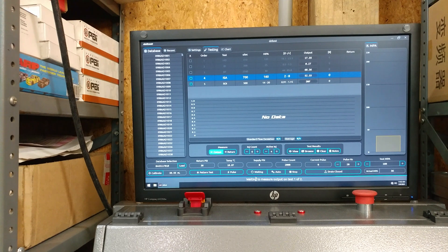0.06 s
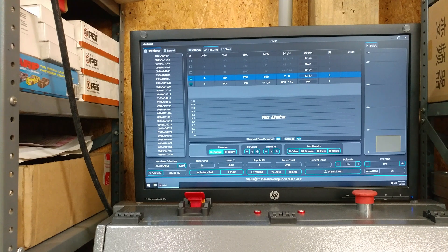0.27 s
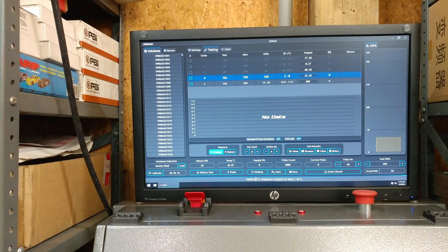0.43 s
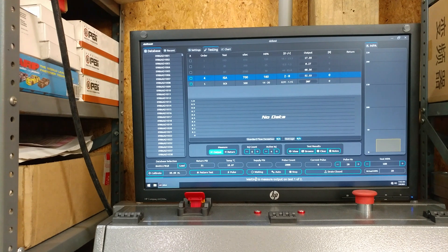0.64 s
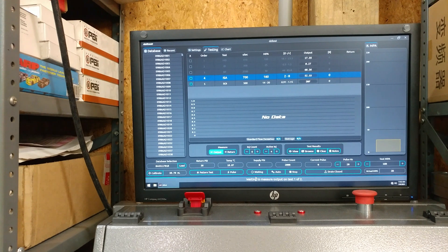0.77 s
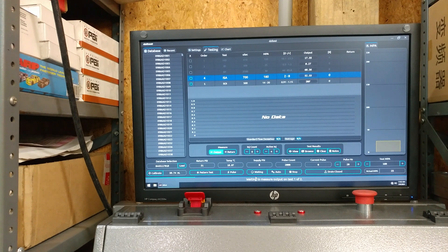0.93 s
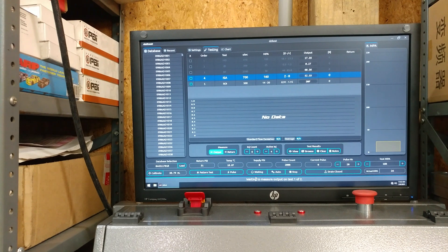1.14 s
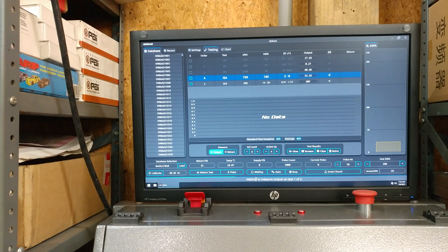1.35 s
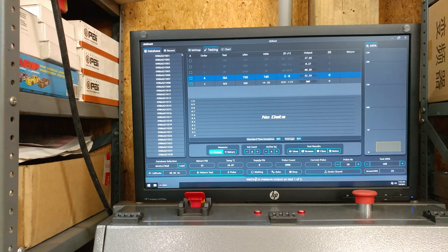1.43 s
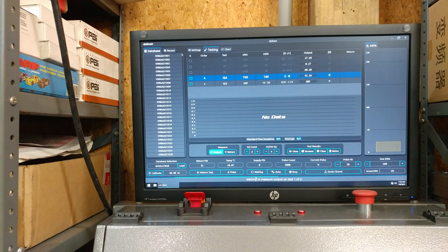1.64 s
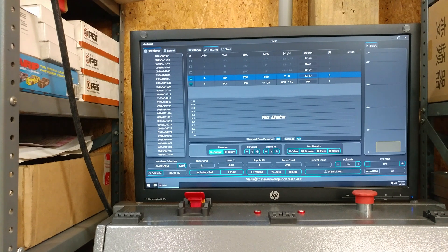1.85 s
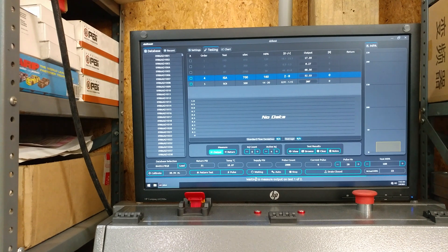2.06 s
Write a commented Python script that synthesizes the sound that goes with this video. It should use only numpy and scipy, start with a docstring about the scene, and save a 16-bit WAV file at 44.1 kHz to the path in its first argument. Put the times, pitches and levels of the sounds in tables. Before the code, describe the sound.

A diesel injector fires ten quick clicking, hollow thumps over a faint fan whine.

```python
"""A cooling fan whines throughout, and sharp clicks with hollow thumps soon start over it.
They are a diesel injector on a test bench in a small workshop, firing ten times, ten a second.
In each shot the steel valve clicks brightly, then the fuel rings the measuring chamber and the cabinet.
The shots are nearly alike and slowly weaken."""
import sys
import numpy as np
from scipy import signal
from scipy.fft import irfft
from scipy.io import wavfile
from scipy.ndimage import uniform_filter1d

SR = 44100
rng = np.random.default_rng(int(sys.argv[2]) if len(sys.argv) > 2 else 0)


def inscribe(sig):
    """Save sig as 16-bit PCM at rate SR to the path in sys.argv[1].

    A 1-D sig is mono; a 2-D sig holds one channel per row.
    Samples are clipped to [-1, 1] before scaling.
    """
    pcm = np.round(np.clip(np.atleast_2d(sig).T, -1, 1) * 32767)
    wavfile.write(sys.argv[1], SR, pcm.astype(np.int16))


N = 92610
AGE = np.arange(SR // 2) / SR  # seconds since a shot began
CLICK_RISE_S = 0.0043
FUEL_DELAY_S = 0.01029  # from the valve's click to the thump


def undb(db):
    """Turn decibels into a number to multiply a sound by."""
    return 10 ** (np.asarray(db) / 20)


def pan(db):
    """Left and right gains that make the left side db decibels louder."""
    return undb(np.array([[db], [-db]]) / 2)


def wander(rate_hz):
    """A smooth random drift, about 1 in size, that turns up to rate_hz times a second."""
    step = int(SR / rate_hz)
    stairs = np.repeat(rng.standard_normal(N // step + 1), step)
    drift = uniform_filter1d(stairs, step)[:N]
    return drift / drift.std()


def noise(gain, wide_hz, size=len(AGE)):
    """Stereo noise of level 1, shaped by gain(f); left and right differ more above wide_hz."""
    f = np.fft.rfftfreq(size, 1 / SR) + 1e-3
    mid, side = np.exp(2j * np.pi * rng.random((2, len(f))))
    apart = np.clip(np.hypot(.25, f / wide_hz / 2), 0, 1)
    hiss = irfft(gain(f) * (mid + apart * side * np.array([[1], [-1]])), size)
    return hiss / hiss.std()


def colour(points):
    """A gain curve drawn through points of f/Hz, level/dB."""
    hz, db = np.array(points).T
    return lambda f: undb(np.interp(np.log(f), np.log(hz), db))


def band(hz, width):
    """Noise in one band of pitches, centred on hz."""
    return noise(lambda f: 1 / (1 + (2 * (f - hz) / width) ** 4) ** .5, wide_hz=500)


def ring(delay, rise, t60):
    """A loudness curve that waits, builds up and fades; t60 is the seconds it takes to fade by 60 dB."""
    age = np.maximum(AGE - delay, 0)
    return (1 - np.exp(-age / rise)) * np.exp(-np.log(1000) * age / t60)


def fan():
    """The spinning blades make slightly wavering tones over a rush of air."""
    # the blade tones, as multiples of base_hz
    multiples = [1, 2, 5, 8, 10, 12, 15]
    # strength of each blade tone: level/dB
    levels = [-74.5, -69, -53.5, -61, -63, -65.5, -75.5]
    # tone colour of the rushing air: f/Hz, relative level/dB
    air = [(20, -18), (35, -16), (60, -11.5), (140, -14), (200, -19), (300, -27), (370, -13), (430, -14.5),
           (600, -12.5), (800, -12.5), (970, -1), (1100, -15), (1350, 4.5), (1570, -15), (1800, -10),
           (2050, -19), (2350, -16.5), (3300, -28), (6000, -27.5), (7200, -31), (8400, -22), (9400, -29),
           (10600, -42), (16000, -33)]
    base_hz, waver, flutter_db = 184.63, 0.000394, 1.7
    phase = 2 * np.pi * base_hz * np.cumsum(1 + waver * wander(4.78)) / SR
    whine = sum(undb(db + flutter_db * wander(9.03)) * np.sqrt(2) * np.sin(multiple * phase)
                for multiple, db in zip(multiples, levels))
    return whine + undb(-48.5) * noise(colour(air), wide_hz=1760, size=N)


def bench_kick():
    """The bench recoils with a low note as the valve opens."""
    return undb(-43) * ring(0, CLICK_RISE_S, t60=0.15) * np.sin(2 * np.pi * 103.6 * AGE)


def valve_click():
    """The steel valve rings at crowded pitches that blur into noise; gives one sound per band."""
    # ringing bands of the steel: f/Hz, width/Hz, level/dB, delay/s, t60/s
    steel_bands = [(2645, 460, -45, 0.0013, 0.11), (4450, 690, -48.5, 0.00034, 0.2),
                   (5190, 350, -49, 0.0016, 0.212), (5870, 390, -29.5, 0.0053, 0.083),
                   (6264, 460, -36, 0.006, 0.16), (7830, 820, -42, 0.00097, 0.14),
                   (9070, 910, -37.5, 0.00096, 0.14), (9980, 380, -31.5, 0.0011, 0.073),
                   (10340, 330, -34, 0.0013, 0.083), (10750, 500, -38.5, .002, 0.16),
                   (11445, 310, -39.5, .002, 0.1), (12300, 2400, -41.5, .0005, 0.139),
                   (13670, 1000, -34.5, 0.00187, 0.085)]
    return np.array([2 * undb(db) * band(hz, width) * ring(delay, CLICK_RISE_S, t60)
                     for hz, width, db, delay, t60 in steel_bands])


def valve_clink():
    """A few of the steel's notes ring out clearly."""
    # clear notes of the steel: f/Hz, level/dB
    steel_notes = [(2790, -43), (4400, -47), (5778, -35.5), (6105, -46.5), (6234, -41), (6412, -32),
                   (9012, -25), (9722, -30), (9835, -36), (10164, -42.5), (10234, -34), (10325, -27.5),
                   (10853, -44.5), (13378, -34)]
    notes = sum(undb(db) * np.sin(2 * np.pi * (hz * AGE + rng.random((2, 1)))) for hz, db in steel_notes)
    return notes * ring(0.00034, CLICK_RISE_S, t60=0.15)


def workshop_echo():
    """The room answers a shot with a short wash of noise; the low notes stay longest."""
    # tone colour of the echo: f/Hz, relative level/dB
    room = [(30, -24), (60, -17), (100, -1), (135, -7.5), (168, -16), (230, 3), (288, -13), (380, 3.5),
            (500, 4.5), (600, -1), (800, -3), (1400, -7), (2000, -15), (3500, -22), (8000, -49)]
    delay_s, rise_s, tail_top_hz = 0.0029, 0.0092, 430
    gain = colour(room)
    wash = noise(gain, wide_hz=600)
    tail = noise(lambda f: gain(f) / np.hypot(1, (f / tail_top_hz) ** 2), wide_hz=900)
    return (undb(-31.5) * wash * ring(delay_s, rise_s, t60=0.3)
            + undb(-36) * tail * ring(delay_s, rise_s, t60=0.67))


def spray():
    """The jet of fuel makes a brief rush."""
    return undb(-42) * band(hz=1140, width=510) * ring(0.004, CLICK_RISE_S, t60=0.38)


def thump_note(hz, pan_db, lead_s):
    """One note of the thump, reaching the left microphone lead_s sooner than the right."""
    shift = np.array([[.5], [-.5]]) * lead_s
    return pan(pan_db) * np.sin(2 * np.pi * hz * (AGE - FUEL_DELAY_S + shift))


def chamber(elapsed):
    """The jet of fuel rings one note in the chamber, a little lower with each shot."""
    age = np.maximum(AGE - FUEL_DELAY_S, 0)

    def held(hold_s, release_s):
        return 1 / (1 + np.exp(np.minimum(2 * (age - hold_s) / release_s, 20)))

    attack = np.sin(np.pi / 2 * np.minimum(age / 0.008, 1)) ** 2
    overshoot = 0.52 * pan(4.5) * np.exp(-((age - 0.0099) / 0.0046) ** 2)  # the first swing is biggest
    linger = undb(-12.5)  # the share of the note that the cabinet holds a little longer
    body = (1 - linger) * held(0.044, 0.011) + linger * held(0.09, 0.013)
    note = thump_note(hz=395.8 - 5.5 * elapsed, pan_db=-0.5, lead_s=0.00009)
    return undb(-13) * attack * (body + overshoot) * note


def cabinet(elapsed):
    """The thump shakes the cabinet's own notes; from shot to shot some grow and others weaken."""
    # cabinet notes: f/Hz, level/dB, t60/s, level change/(dB/s), left minus right/dB, left lead/s
    notes = [(106.6, -45, 0.49, -5, -3, 0), (142.8, -43.5, 0.76, -0.5, -1, 0),
             (201, -37.5, 0.41, -0.5, -0.5, .0001), (243, -42, 0.11, -11, -9, .0002),
             (252, -31, 0.13, -24, -5.37, .00025), (380, -46.5, 0.26, -9, 15.5, .00002),
             (427.6, -22, 0.12, 13.5, -3, .00003), (474.4, -25, 0.17, -5, 9.5, -.0001),
             (542.7, -24, 0.1162, 9.5, -2.5, .0001), (579.4, -31.5, 0.11, 11.5, 14.5, -.00022),
             (663.5, -30, 0.12, 14.5, -3.3, -0.0028), (828, -42.5, 0.24, -19, -1, .00004)]
    return sum(undb(db + change * elapsed) * ring(0.01363, 0.0063, t60) * thump_note(hz, pan_db, lead_s)
               for hz, db, t60, change, pan_db, lead_s in notes)


def injector():
    """Each shot repeats the click, kick, echo and thump, with a slightly varied click and a new spray."""
    # the shots: t/s, thump level/dB, click level/dB
    shots = [(0.1894, 2.5, -1), (0.2893, 2.5, -1), (0.389, 2.35, -1.5), (.4890, 2.2, -1.4),
             (0.5891, 1.94, -1), (0.689, 1.6, -1), (0.7888, 1, -0.5), (0.8885, 0.5, -2), (.9885, -1, -1.9),
             (1.0883, -1.5, -1.8)]
    scatter, strike_spread_db = 0.335, 1.14  # how much the click differs from shot to shot
    out = np.zeros((2, N))
    usual_bands, clink, echo, kick = valve_click(), valve_clink(), workshop_echo(), bench_kick()
    for start, thump_db, click_db in shots:
        elapsed = start - shots[0][0]  # seconds since the first shot
        bands = (usual_bands + scatter * valve_click()) / np.hypot(1, scatter)
        strike = undb(strike_spread_db * rng.standard_normal((len(bands), 1, 1)))  # one gain per band
        click = undb(click_db) * pan(1.4) * (clink + (strike * bands).sum(axis=0))
        thump = undb(thump_db) * (kick + chamber(elapsed) + cabinet(elapsed) + echo)
        first = int(start * SR)
        out[:, first:first + len(AGE)] += click + thump + spray()
    return out


def scene():
    """The injector fires over the steady fan."""
    return injector() + fan()


def record(dry):
    """The microphone softens the highest treble and the recorder cuts off the very top."""
    microphone = signal.butter(4, 15000, fs=SR, output="sos")
    recorder = signal.ellip(8, .2, 70, 15800, fs=SR, output="sos")
    return signal.sosfilt(recorder, signal.sosfilt(microphone, dry))


dry = scene()
out = record(dry)
inscribe(out)
```